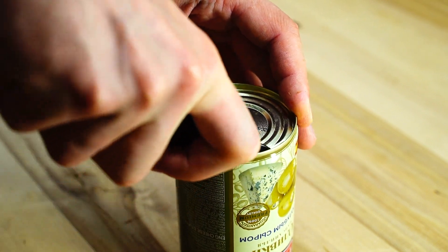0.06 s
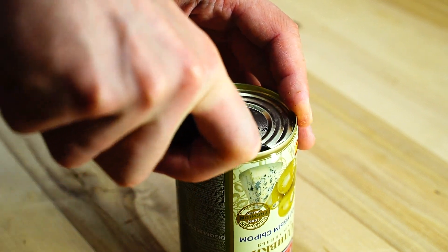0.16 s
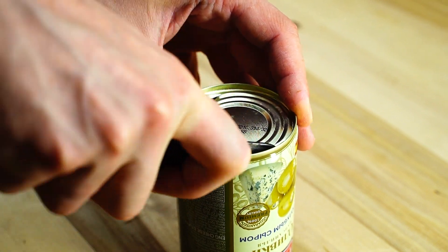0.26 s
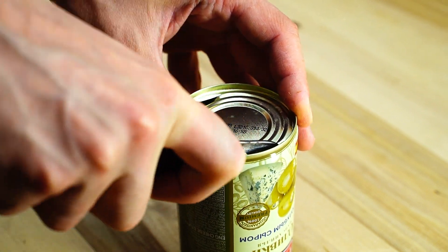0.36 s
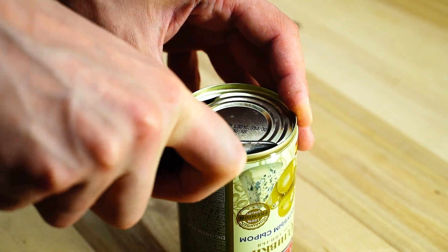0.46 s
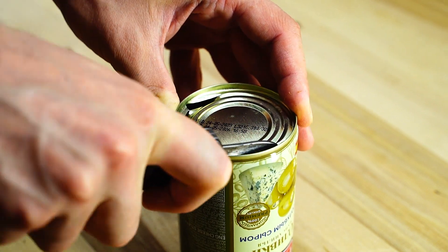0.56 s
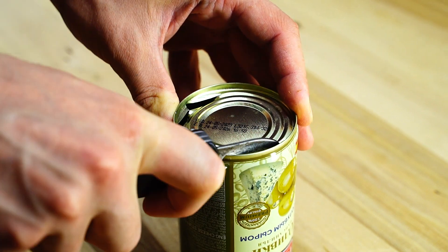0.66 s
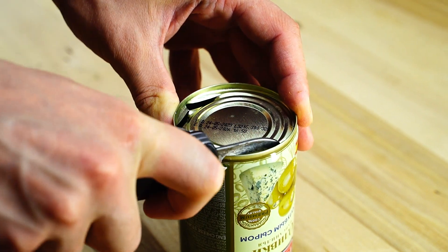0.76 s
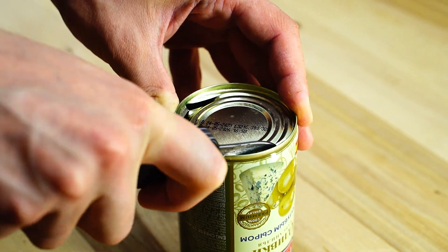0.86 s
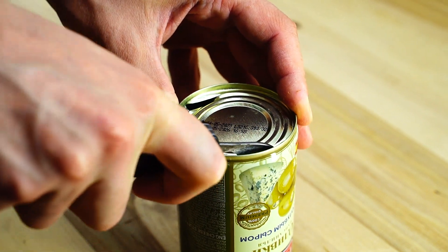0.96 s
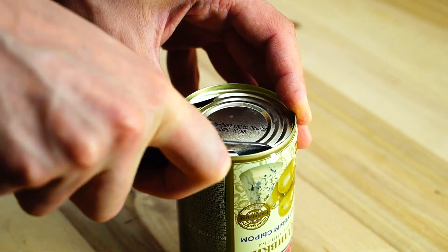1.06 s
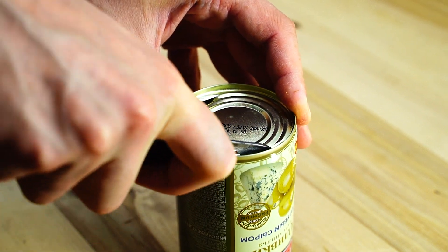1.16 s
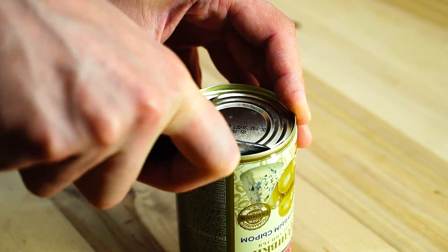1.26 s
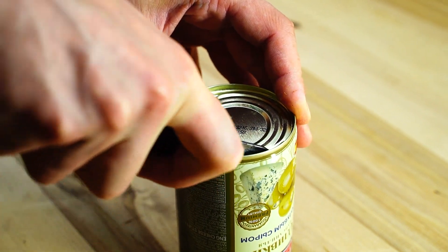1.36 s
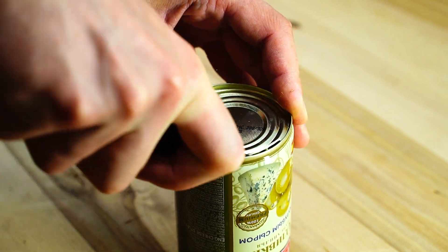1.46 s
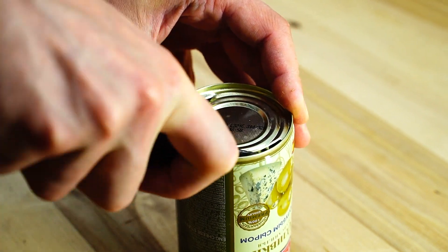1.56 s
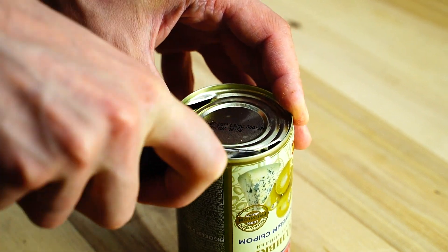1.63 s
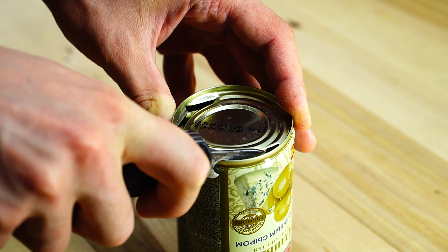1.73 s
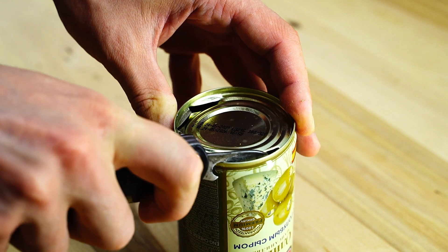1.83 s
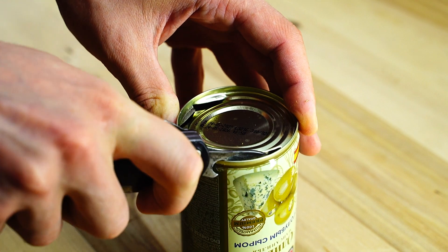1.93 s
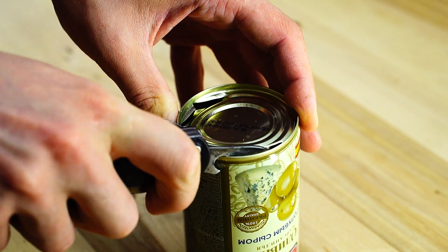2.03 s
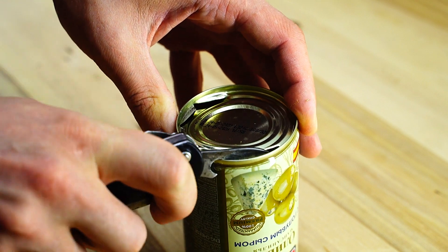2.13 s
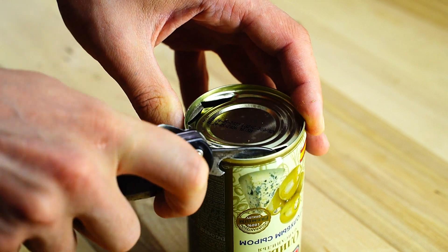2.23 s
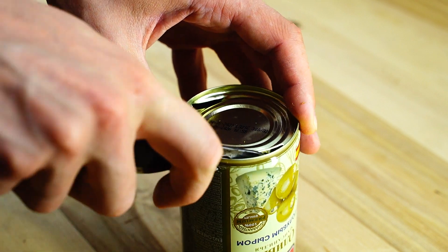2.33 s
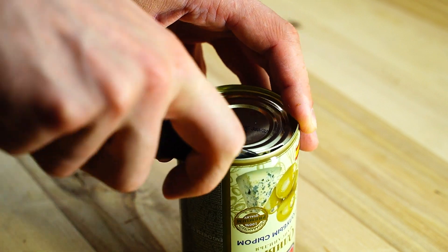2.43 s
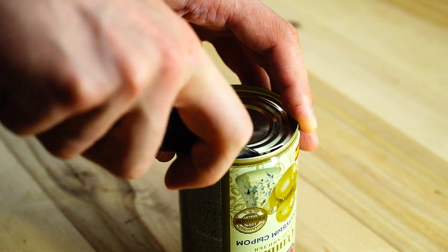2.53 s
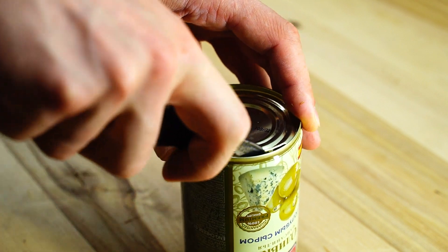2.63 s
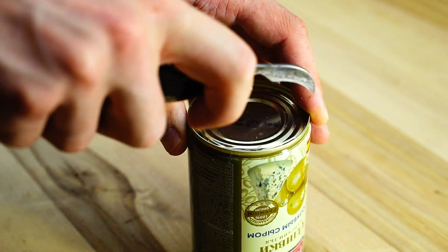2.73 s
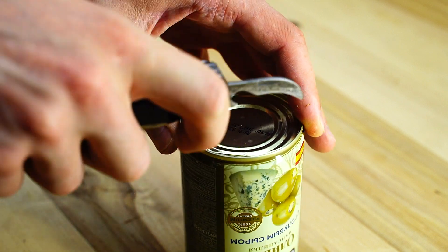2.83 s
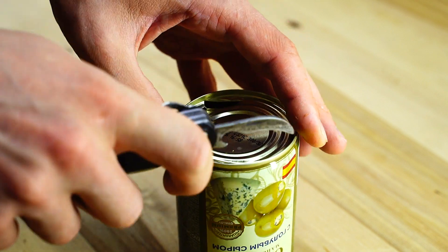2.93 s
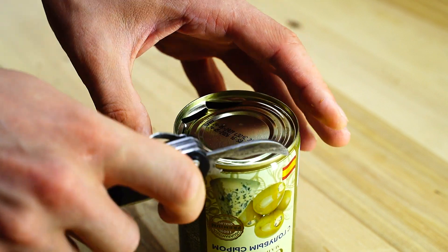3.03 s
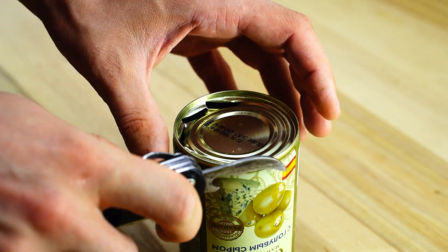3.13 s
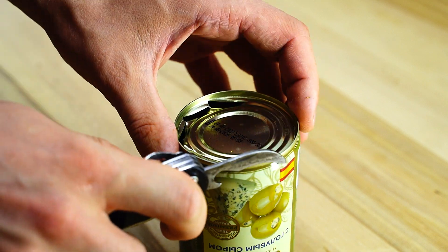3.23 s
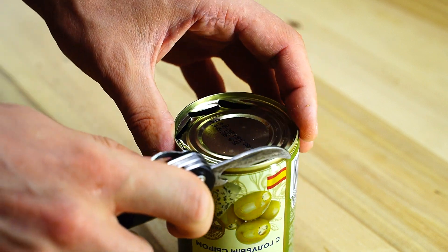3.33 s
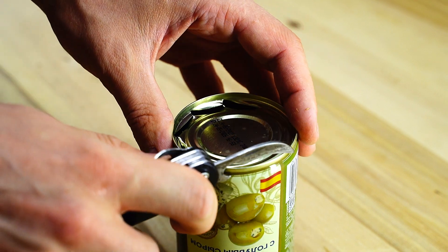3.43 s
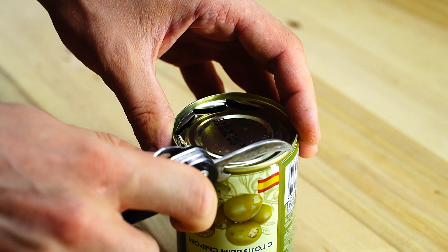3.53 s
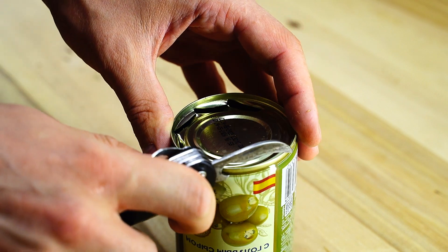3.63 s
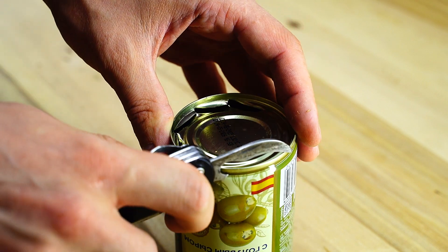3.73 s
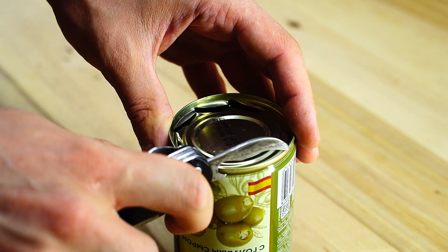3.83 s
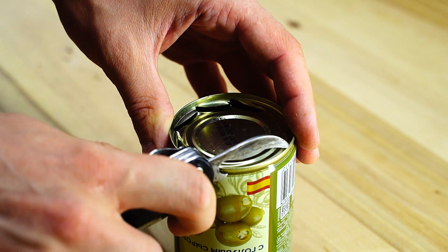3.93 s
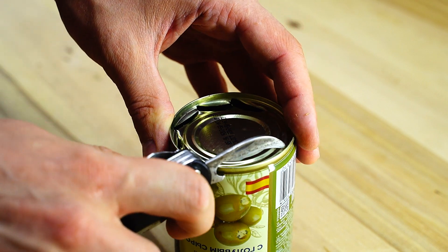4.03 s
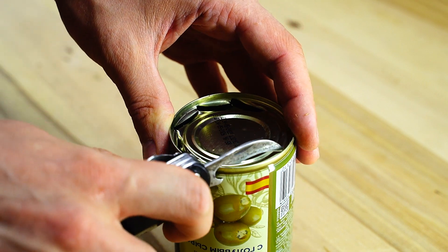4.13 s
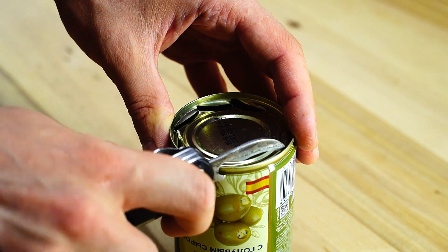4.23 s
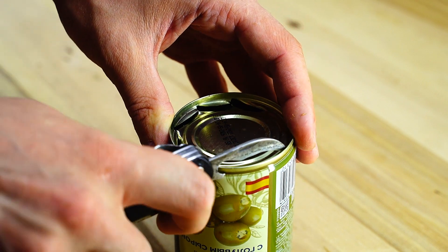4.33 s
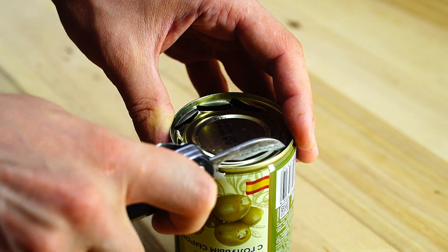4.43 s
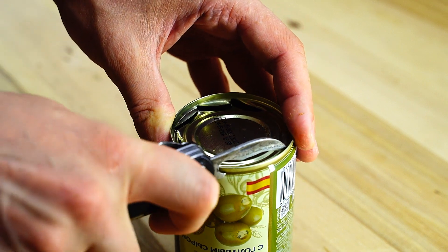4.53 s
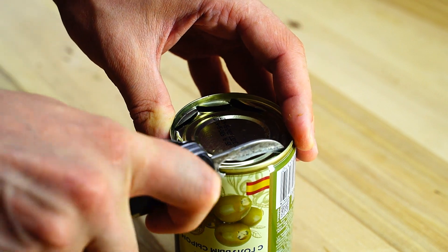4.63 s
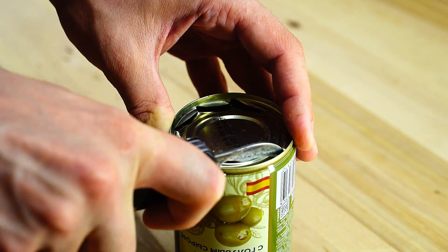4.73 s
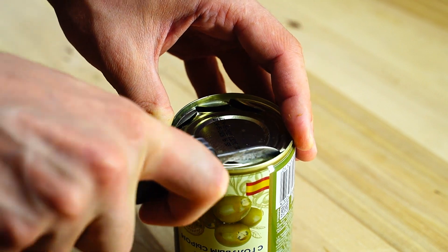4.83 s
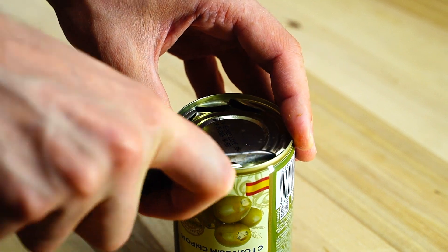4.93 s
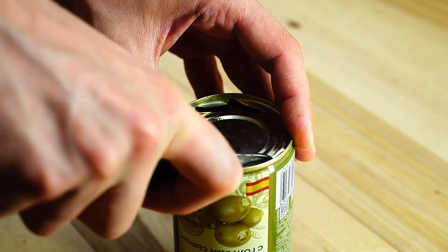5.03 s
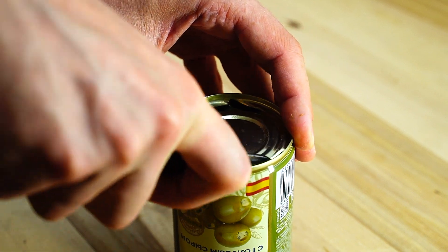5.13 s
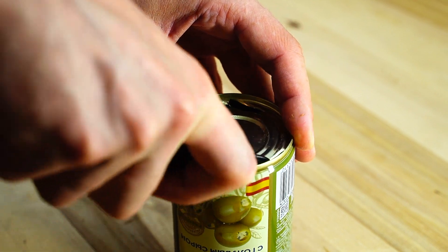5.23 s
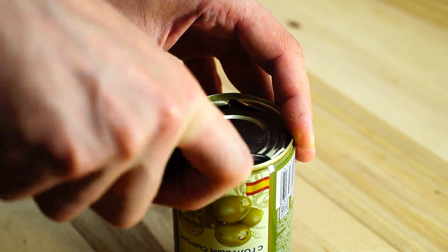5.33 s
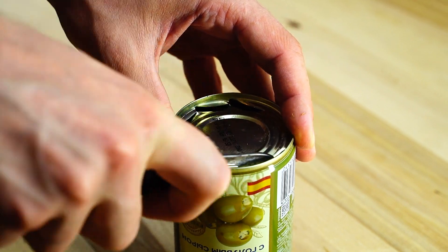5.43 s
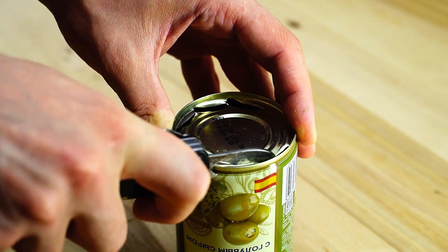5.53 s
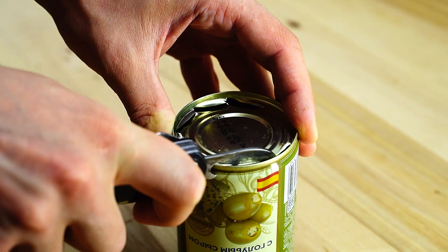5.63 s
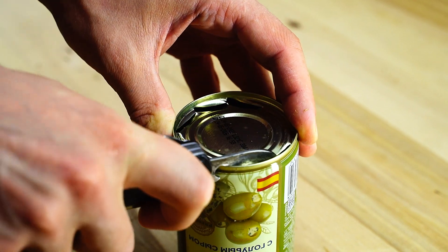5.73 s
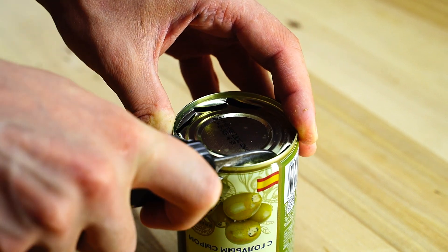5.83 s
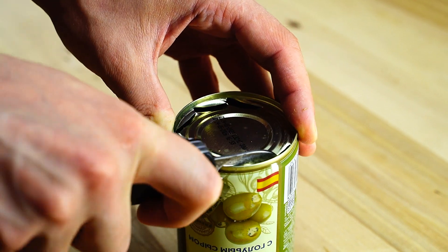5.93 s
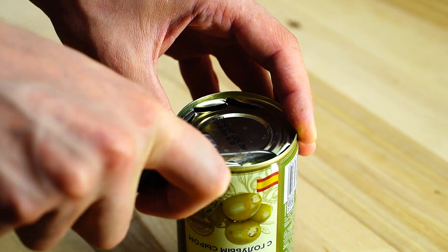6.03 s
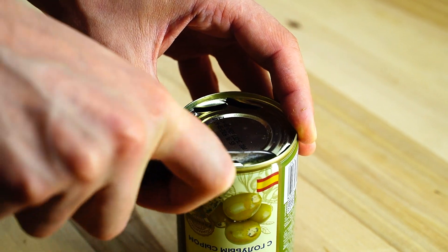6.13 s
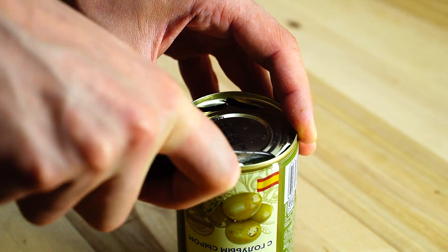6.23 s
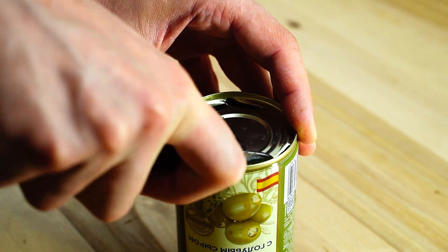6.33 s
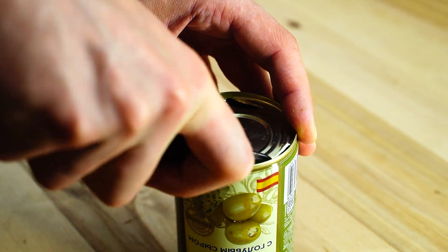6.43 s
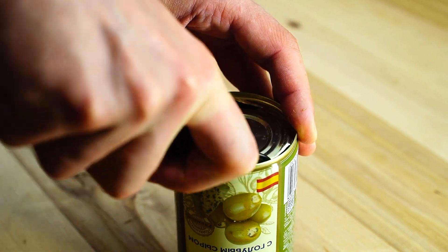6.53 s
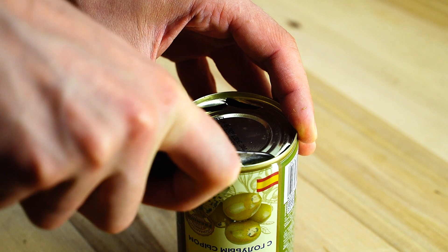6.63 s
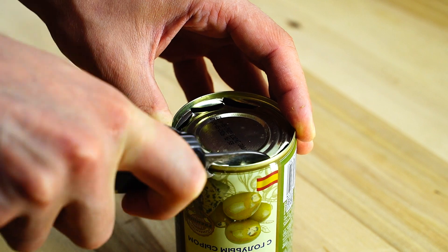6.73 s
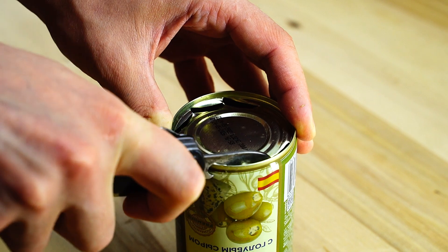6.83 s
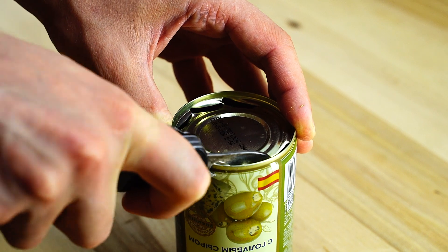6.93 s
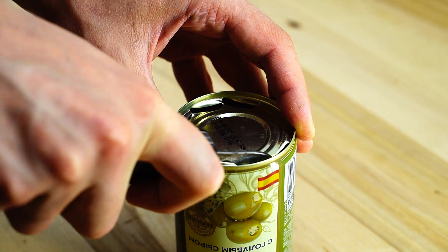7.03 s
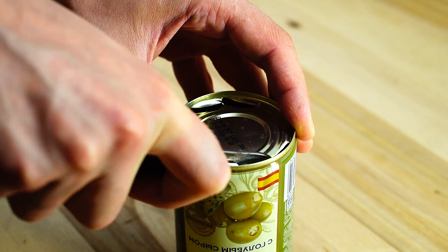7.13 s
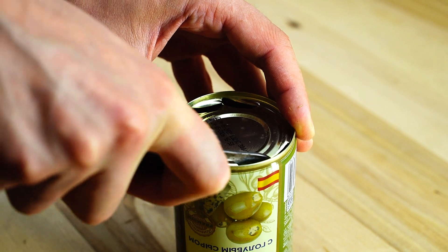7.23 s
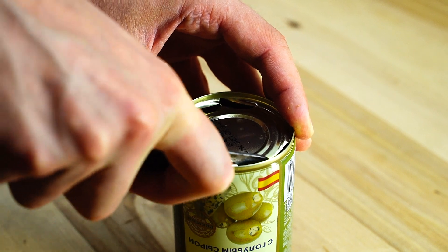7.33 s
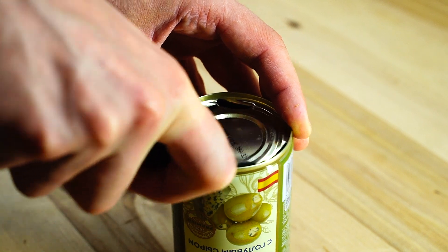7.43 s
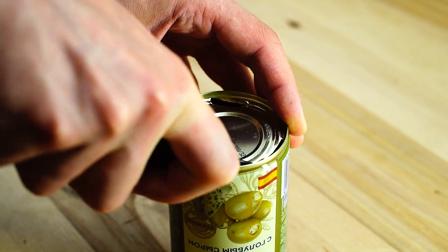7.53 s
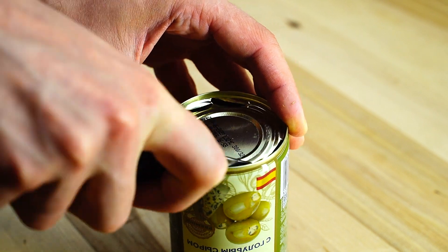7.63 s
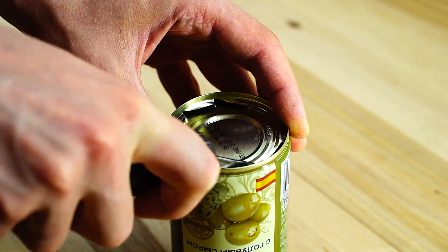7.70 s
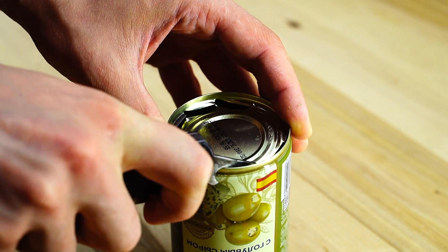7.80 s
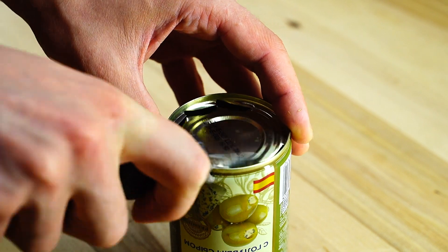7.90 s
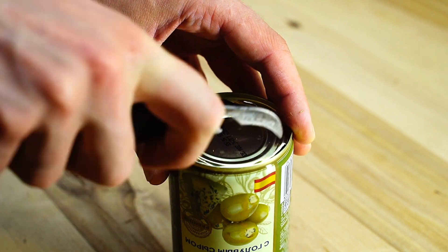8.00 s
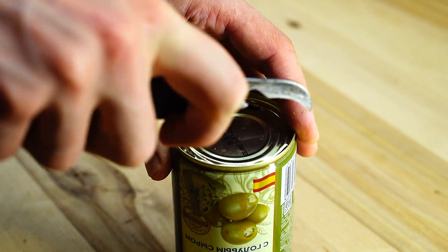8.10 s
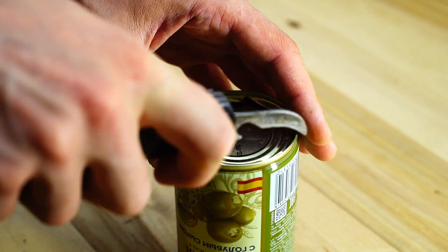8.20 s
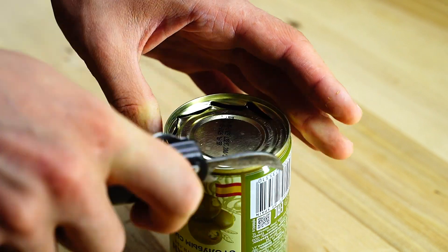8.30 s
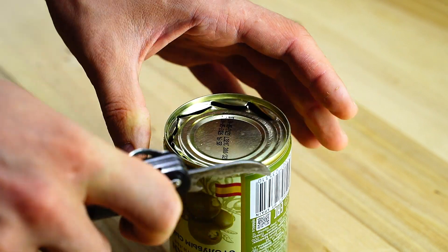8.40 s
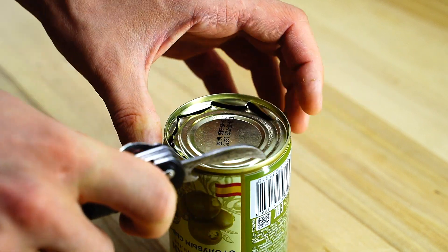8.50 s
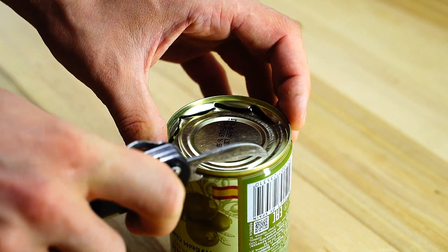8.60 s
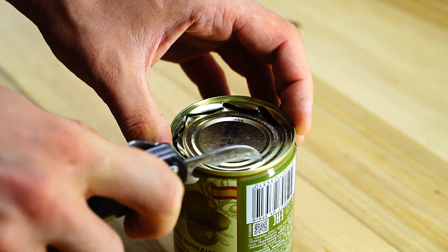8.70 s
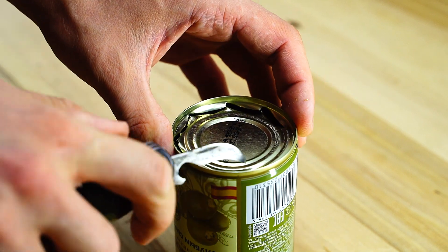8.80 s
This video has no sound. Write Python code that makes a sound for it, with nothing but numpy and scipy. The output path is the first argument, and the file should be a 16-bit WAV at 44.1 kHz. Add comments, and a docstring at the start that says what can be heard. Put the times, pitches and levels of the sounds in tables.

```python
"""A lever can opener works round the rim of a tin on a wooden table, miked close in a small bare room.
Each push of the blade is a burst of random slips that shakes the tin; the lid groans, squeals and buckles.
Loud snaps are short bursts of noise through the tin's resonances; twice the opener is jerked out and rings.
The room adds a decaying tail to most of it, over a steady hush. The recorder's limiter ducks on loud peaks
and then recovers, so the tail swells up behind them."""
import sys
import numpy as np
from scipy import signal
from scipy.fft import rfft, irfft, next_fast_len
from scipy.io import wavfile
from scipy.ndimage import map_coordinates

SR = 44100
rng = np.random.default_rng(int(sys.argv[2]) if len(sys.argv) > 2 else 0)


def unload_audio(sound):
    """Save the sound as a 16-bit wav file, at the path given as the first command line argument."""
    columns = np.transpose(np.atleast_2d(sound))
    # keep every value between -1 and 1, then stretch to whole-number steps
    steps = np.round(np.clip(columns, -1, 1) * 32767)
    wavfile.write(sys.argv[1], SR, steps.astype(np.int16))


N = 390726
TIME = np.arange(N) / SR
BLOW = TIME[:SR // 3]  # time within one blow [s]

# The hand pushes the blade along the cut; levels are before the trim of each layer:
# (start [s], swell [s], hold [s], friction [dB], treble over friction [dB],
#  groan of the lid over friction [dB], groan pitch at full effort [Hz])
PUSHES = [(0.439, 0.012, 0.0096, -30, 6, -5.5, 620), (0.499, 0.014, 0.0073, -35, 7.5, -5, 560),
          (0.576, .024, 0.051, -23.5, 0, 1, 620), (.872, .015, 0.076, -44.5, -4, -10.5, 620),
          (0.961, 0.019, 0.081, -47, -5.5, -1, 600), (1.073, 0.047, 0.1196, -55.5, -11, 11.5, 560),
          (1.71, 0.034, 0.018, -31, -2, 7, 505), (1.8, 0.016, 0.0516, -41, -5, 7, 570),
          (1.965, 0.033, 0.013, -43.5, -4.5, -4, 455), (2.086, .014, .055, -40, 1, -8, 600),
          (2.245, 0.012, 0.058, -38, -3.5, 7, 540), (2.315, 0.017, 0.07, -36, 0.5, 0, 580),
          (2.404, 0.011, 0.0085, -30, 0, 8.5, 587.6), (2.453, 0.0068, 0.0078, -29, -25, 9, 588),
          (2.516, 0.049, 0.019, -32.5, 4.5, 7.5, 454), (2.648, 0.062, 0.014, -23, 3.5, 3.5, 470),
          (2.819, 0.033, .06, -41, 0, -3.5, 500), (2.933, 0.027, 0.048, -39.5, 0.5, 2.5, 490),
          (3.262, 0.036, 0.065, -37.5, -4, 1.5, 500), (3.786, 0.032, .08, -56, 0, 1, 500),
          (4.009, 0.013, 0.015, -37.5, -8, -3, 480), (4.236, .035, 0.049, -50, -8, 8, 480),
          (4.882, 0.039, 0.045, -30, -7, 2, 456), (4.98, 0.026, .06, -26.5, -22, 1, 490),
          (5.098, 0.03, 0.056, -38, -34, 7.5, 444), (5.233, 0.037, 0.032, -51.5, -13, 2.5, 500),
          (5.402, 0.016, .025, -43.5, 6, 3.5, 544), (5.441, 0.017, 0.1295, -29.5, -2, 1, 570),
          (5.569, 0.021, 0.023, -27.5, 2, -1.5, 520), (5.761, .025, .025, -36, -2.5, 10, 503),
          (5.811, .02, 0.047, -42.5, -0.5, 13, 510), (6.045, 0.037, 0.059, -42.5, -3.5, 11.5, 580),
          (6.16, 0.02, .02, -48.5, -12, 12.5, 610), (6.28, 0.035, 0.14, -43, -18, 2, 400),
          (6.467, 0.056, 0.052, -46, -16, 2.5, 430), (6.654, 0.042, 0.014, -39, -7, 6, 605.3),
          (6.707, 0.007, 0.035, -32.5, -5, 9.5, 605), (6.748, 0.016, 0.025, -27.5, -4.5, 5.5, 560),
          (6.795, 0.015, 0.034, -43, -2, 12, 540), (6.991, 0.032, 0.044, -44.5, -3.5, 7, 590),
          (7.031, 0.058, 0.014, -33, -5.5, 5, 620), (7.154, 0.035, 0.0087, -44, -2, 3, 590),
          (7.367, 0.062, 0.015, -46.5, -14, -14, 500), (8.019, .035, 0.029, -21, 2, 1.5, 539.3),
          (8.193, 0.036, 0.12, -47, 11, -15.5, 500), (8.303, 0.034, .012, -41.5, 8.5, -8.5, 500),
          (8.635, 0.053, .02, -40.5, 5, 7.5, 630), (8.74, .025, .015, -48.5, -1, 0, 630)]
# Free modes of the opener's steel, lowest first: (frequency [Hz], level [dB], t60 [s])
STEEL_MODES = [(1286, -13, 1.9), (2256, -3, .45), (2620, 0, .35), (3165, -6, .5), (3765, 1, .4),
               (4785, 16, .3), (5276, -10, .55), (6422, -9, .5), (8140, 6, .18)]


def from_db(db):
    """Decibels to gain."""
    return 10 ** (np.asarray(db) / 20)


def rms_one(x):
    """Scale to rms 1."""
    return x / np.sqrt(np.mean(x ** 2) + 1e-20)


def height_one(x):
    """Scale a blow so that its eight largest samples average 1."""
    return x / np.sort(np.abs(x))[-8:].mean()


def at_hz(points, hz):
    """Read a table on a log-frequency axis."""
    f, value = np.transpose(points)
    return np.interp(np.log(np.maximum(hz, 1)), np.log(f), value)


def colour(x, *spectra):
    """Filter a signal by the sum of some spectra in dB, then scale to rms 1."""
    size = next_fast_len(len(x))
    hz = np.arange(size // 2 + 1) * SR / size
    gain = from_db(sum(at_hz(s, hz) for s in spectra))
    return rms_one(irfft(rfft(x, size) * gain, size)[:len(x)])


def butter(x, hz, kind):
    """Butterworth filter of design order 2."""
    return signal.sosfilt(signal.butter(2, hz, kind, fs=SR, output="sos"), x)


def add(track, s, sound):
    """Mix a sound in at a time."""
    start = round(s * SR)
    track[start:start + len(sound)] += sound[:N - start]


def drift(rate_hz):
    """Random wander between normal draws of spread 1, two draws per cycle of the rate."""
    steps = np.arange(0, TIME[-1] + 1, 1 / (2 * rate_hz))
    return np.interp(TIME, steps, rng.standard_normal(len(steps)))


def effort(start, swell_s, hold_s):
    """One move of the hand, from 0 to 1: a power-law swell, a sag as the metal gives way, a fast release."""
    swell_power, sag_db_per_s, release_db_per_s = 1.345, 40, 430
    t, out = TIME[:SR], np.zeros(N)
    sag_db = sag_db_per_s * np.maximum(t - swell_s, 0)
    release_db = release_db_per_s * np.maximum(t - swell_s - hold_s, 0)
    swell = np.minimum(t / max(swell_s, .002), 1) ** swell_power
    add(out, start, swell * from_db(-sag_db - release_db))
    return out


def moves(rows, bend=0):
    """Gain and pitch of moves (start, swell, hold, dB, Hz); the strongest sets the pitch, bent by effort."""
    gain, pitch = np.zeros(N), np.full(N, float(rows[0][-1]))
    for start, swell_s, hold_s, level_db, hz in rows:
        force = effort(start, swell_s, hold_s)
        level = from_db(level_db) * force
        leads = level > gain
        gain[leads] = level[leads]
        pitch[leads] = hz * (1 + bend * (force[leads] - 1))
    return gain, pitch


def curve(rows):
    """Gain (-120 dB outside the rows) and pitch of a short curve."""
    s, level_db, hz = np.transpose(rows)
    gain = from_db(np.interp(TIME, s, level_db, left=-120, right=-120))
    return gain, np.interp(TIME, s, hz)


def slips(per_s, spread_db):
    """Tiny stick-slip releases at random moments, of uneven size and either sign."""
    sizes = from_db(spread_db * np.minimum(rng.exponential(1, N), 4))
    return (rng.random(N) < per_s / SR) * sizes * rng.choice([-1, 1], N)


def rubbed(gain, hz, width_hz, skirt_hz, skirt_db):
    """Friction drives a resonance of given pitch: a narrow core on a broad skirt."""
    phase = 2 * np.pi * np.cumsum(hz) / SR
    half_width = width_hz / 2
    out = 0
    for carrier in (np.sin(phase), np.cos(phase)):
        drive = slips(per_s=1300, spread_db=0.5)
        core = rms_one(butter(drive, half_width, "low"))
        skirt = rms_one(butter(drive, [half_width, half_width + skirt_hz], "band"))
        out = out + carrier * (core + from_db(skirt_db) * skirt)
    return gain * rms_one(out)


def tin(x, detune=0., stand_out_db=0, wander_db=0, wander_hz=14):
    """Resonances of lid and wall stand out: pressure detunes them, a moving contact favours them in turn."""
    # (frequency before detuning [Hz], width [Hz], level over the direct sound, before stand_out_db [dB])
    tin_modes = [(647, 100, -2), (948.3, 19, 6.5), (1243, 16, 6.5), (1918, 36, 3), (2082, 40, 3.5),
                 (2403, 37, -10), (2600, 46, 4), (3211, 27, 8), (3787, 30, 8.5), (5120, 18, 3.5),
                 (5595, 28, 12), (6550, 110, 8.5), (8120, 210, 0.5), (9080, 370, -2), (12040, 220, 0)]
    out = x.copy()
    for hz, width, level_db in tin_modes:
        r = np.exp(-np.pi * width / SR)
        w = 2 * np.pi * hz * (1 + detune * rng.uniform(-0.85, 1)) / SR
        drive = x * from_db(wander_db * drift(wander_hz)) if wander_db else x
        b, a = np.array([1, 0, -1]) * (1 - r * r) / 2, [1, -2 * r * np.cos(w), r * r]
        # the tiny offset keeps the filter out of denormal numbers
        out += from_db(level_db + stand_out_db) * signal.lfilter(b, a, drive + 1e-18)
    return out


def catching():
    """The blade catches and lets go many times a second, as a random wander of the level."""
    return from_db(2.2 * drift(45))


def grinding(level_db=-1, treble_db=-5, split_hz=5000):
    """Slips of the blade shake the tin during each push; a sharper bite is brighter."""
    # colour of the slips: (frequency [Hz], level [dB])
    grind_spectrum = [(30, -32), (90, -10), (140, 11.5), (230, -4.5), (420, 12), (1100, 7), (1600, 6),
                      (2300, 3.5), (3500, -0.5), (4500, -6.5), (7000, -9.5), (11000, -10.5), (16000, -13)]
    gain, bite = np.zeros(N), np.zeros(N)
    for start, swell_s, hold_s, friction_db, bite_db, _, _ in PUSHES:
        friction = from_db(friction_db) * effort(start, swell_s, hold_s)
        gain = np.maximum(gain, friction)
        bite = np.maximum(bite, from_db(bite_db) * friction)
    drive = colour(slips(per_s=4000, spread_db=2.5) * catching(), grind_spectrum)
    grit = tin(drive, stand_out_db=3, wander_db=4.5)
    # the changing load bends all resonances together a little
    grit = map_coordinates(grit, [np.cumsum(1 + .018 * drift(3))], order=3, mode="mirror")
    # the dull part is levelled by its middle band
    dull = butter(grit, split_hz, "low") / np.std(butter(grit, [1500, 4500], "band"))
    bright = rms_one(butter(grit, split_hz, "high"))
    return from_db(level_db) * gain * dull - from_db(treble_db) * bite * bright


def groaning(level_db=-1, creak_db=-14, creak_low_hz=130, creak_high_hz=380):
    """The same pushes drive the lid's lowest mode and make the tin creak dully against the table."""
    rows = [(start, swell_s, hold_s, friction_db + groan_db, hz)
            for start, swell_s, hold_s, friction_db, _, groan_db, hz in PUSHES]
    # bend: share by which the pitch drops as the effort falls to nothing
    gain, pitch = moves(rows, bend=.04)
    creak = gain * rms_one(butter(slips(per_s=180, spread_db=3.5), [creak_low_hz, creak_high_hz], "band"))
    groan = rubbed(gain, pitch, width_hz=47.6, skirt_hz=194, skirt_db=-3.0)
    return from_db(level_db) * groan + from_db(creak_db) * creak


def squeals(waver_hz=14, rise_db=16):
    """The sliding blade locks on to single modes; each swells, wavers in pitch and rings out."""
    # (start [s], loudest [s], centre pitch [Hz], rms level when loudest [dB], t60 [s])
    squeal_times = [(2.73, 2.765, 603, -6.5, 0.061), (2.72, 2.795, 1278, -6, 0.14),
                    (2.72, 2.73, 1230, -13, .2), (2.765, 2.8, 780, -23, 0.058), (2.72, 2.726, 3772, 1, 0.1),
                    (4.995, 5.02, 2300, -30.5, 0.095), (5.51, 5.555, 600, -20, 0.2),
                    (5.57, 5.615, 500, -17.5, 0.23)]
    out = np.zeros(N)
    t = TIME[:SR]
    for start, top, hz, level_db, t60 in squeal_times:
        rise = max(top - start, .002)
        # the waver fades once the blade no longer drives the mode
        sticking = np.exp(-np.maximum(t - rise, 0) / 0.078)
        waver = rms_one(butter(rng.standard_normal(SR), 180, "low"))
        pitch = hz + waver_hz * sticking * waver
        shape_db = np.minimum(rise_db * (t / rise - 1), -60 * (t - rise) / t60)
        tone = np.sin(2 * np.pi * np.cumsum(pitch) / SR)
        add(out, start, np.sqrt(2) * from_db(level_db + shape_db) * tone)
    return out


def crack(t60, *spectra):
    """A blow sets a dense crowd of short modes ringing: coloured noise that dies away."""
    return colour(rng.standard_normal(len(BLOW)), *spectra) * from_db(-60 * BLOW / max(t60, .003))


def tin_blow(peak_db, bass_db, treble_db, t60, hz, lift_db, stand_out_db):
    """One sharp release of the sheet metal, dull or bright, coloured by the part that springs free."""
    # basic colour of a blow: (frequency [Hz], level [dB])
    snap_spectrum = [(25, -28), (80, -22), (140, -1.5), (190, -11.5), (240, -22), (320, -4.5), (600, 0.5),
                     (1100, -2), (1500, -6.5), (2600, -5), (4800, -9.5), (7500, -11.5), (11000, -16.5),
                     (16000, -19.5)]
    tilt = [(700, bass_db), (2000, 0.0015), (3500, 0.0023), (8000, treble_db)]
    width = 0.2  # share of its pitch over which the part's resonance falls away
    part = [(hz / (1 + width), 0), (hz, lift_db), (hz * (1 + width), 0)]
    burst = tin(crack(t60, snap_spectrum, tilt, part), detune=0.014, stand_out_db=stand_out_db)
    return from_db(peak_db) * height_one(burst)


def snaps():
    """The lid tears: each snap is a blow coloured by the torn flap."""
    # (time [s], peak before filter and limiter [dB], bass tilt [dB], treble tilt [dB], t60 of the burst [s],
    #  pitch of the torn flap [Hz], its lift [dB])
    snap_times = [(.239, 0.5, -20, 2.5, 0.062, 2280, 15), (0.2685, -0.5, -2.5, -5.5, 0.039, 640, 6.5),
                  (0.274, -6, 10, 1.5, 0.02, 672, 19), (0.6409, -9, 8, -15, 0.024, 667, 3.5),
                  (1.451, -9, 10.5, -8, 0.038, 2300, 11), (1.4766, 28.5, -3.5, -0.5, 0.026, 2950, 3),
                  (2.7216, 10.5, -11, -1, 0.035, 1154, 17.5), (4.6952, 8.5, 0.5, -15.5, 0.061, 1187, 6),
                  (4.736, 2, 0.5, -39, 0.03, 675.4, 6.5), (7.5202, -0.5, 8.5, -1.5, 0.056, 473, 8),
                  (7.536, 27, -4, 0, 0.019, 2660, 6), (7.691, 0, 2, -8, 0.021, 653, 7),
                  (7.713, -14, 2, -7.5, .022, 2100, 0.5), (7.7826, 15, -6.5, 6.5, 0.054, 765, 12),
                  (7.9909, -0.5, -7, 7, 0.18, 2600, 15), (8.0002, 11, -5.5, 0.5, 0.061, 1334, 14.5)]
    out = np.zeros(N)
    for s, *blow in snap_times:
        add(out, s, tin_blow(*blow, stand_out_db=-2.0))
    return out


def ticks(t60=0.05, level_db=1):
    """The blade taps the rim, coloured by a resonance of its own."""
    # (time [s], peak before level_db [dB], bass tilt [dB], treble tilt [dB])
    tick_times = [(2.186, -21, 1, -2), (2.3481, -27, 3, -4), (2.4179, -7.5, 11.5, 0), (2.458, -19, -2, 0),
                  (2.5413, -17, 9, 6), (2.5757, -13, 13, 1), (2.7494, -29, -12, 2),
                  (3.2808, -20.5, 21.5, 10), (3.2987, -14.5, -20, -8), (3.3323, -17.5, -11, -1),
                  (3.3913, -9, -4.5, 8.5), (3.5118, -19.5, -5, -6), (3.5312, -20.5, 8, -7),
                  (4.0696, -26, 12, -3), (5.13, -25.5, 19, -14), (5.451, -27, -14, -13),
                  (5.6446, -24, -6, -10), (5.7838, -26.5, -14, -7), (6.0756, -29.5, -14, -23),
                  (6.7087, -20, 24, -19), (6.766, -28, -1, -12), (8.6842, -28.5, 13, -16)]
    blade_hz, blade_lift_db = 5760, 5.5
    out = np.zeros(N)
    for s, peak_db, bass_db, treble_db in tick_times:
        tap = tin_blow(peak_db + level_db, bass_db, treble_db, t60, blade_hz, blade_lift_db, stand_out_db=-1.5)
        add(out, s, tap)
    return out


def seating(t60=0.062, level_db=2, ring_t60=.3):
    """The hook seats on the rim: a dull tap wakes only the steel's lowest mode, damped by the contact."""
    # (time [s], peak of the tap before level_db [dB], ring of the steel over that peak [dB])
    seat_times = [(3.902, -18, -12.5), (4.027, -20.5, -18), (4.197, -21, -10), (4.471, -27.5, -22),
                  (4.558, -29, -41.5)]
    # colour of the tap: (frequency [Hz], level [dB])
    seat_spectrum = [(50, -4), (150, 6), (450, 17.5), (1200, 12), (2000, 0), (3000, -39), (5800, -16.5),
                     (16000, -46)]
    out = np.zeros(N)
    ring = np.sin(2 * np.pi * STEEL_MODES[0][0] * BLOW) * from_db(-60 * BLOW / ring_t60)
    for s, peak_db, ring_db in seat_times:
        add(out, s, from_db(peak_db + level_db) * height_one(tin(crack(t60, seat_spectrum))))
        add(out, s, from_db(peak_db + ring_db) * ring)
    return out


def blows(taps_db):
    """All blows on the tin as they leave in one direction; so small a body radiates little bass."""
    return butter(snaps() + from_db(taps_db) * (ticks() + seating()), 120, "high")


def opener():
    """Jerked out of the cut, the steel rings freely in all its modes."""
    # (time [s], level added to each mode [dB])
    jerk_times = [(2.7225, -21), (8.001, -38)]
    t, out = TIME[:2 * SR], np.zeros(N)
    ring = sum(from_db(db - 60 * t / t60) * np.sin(2 * np.pi * hz * t) for hz, db, t60 in STEEL_MODES)
    for s, level_db in jerk_times:
        add(out, s, from_db(level_db) * ring)
    return out


def rasping():
    """The blade rasps out of the slit: friction on a resonance of falling pitch."""
    # (time [s], level before the trim below [dB], pitch [Hz])
    rasp_curve = [(7.79, -17.5, 959), (7.845, -9, 903), (7.88, -17.5, 890.5), (7.97, -52, 865)]
    return from_db(-2) * rubbed(*curve(rasp_curve), width_hz=130, skirt_hz=297, skirt_db=-13.5)


def knocks(thud_db=-5, thud_t60=0.068, level_db=-1, give_s=0.001):
    """The lid buckles: its lowest mode, tuned by the pressure on it, with a thud from the table."""
    # (time [s], level before level_db [dB], pitch [Hz], t60 [s])
    knock_times = [(0.847, -37.5, 600, 0.051), (0.939, -17.5, 646, 0.034), (1.336, -32.5, 312, 0.067),
                   (1.759, -14.5, 420, 0.083), (1.775, -11, 530, 0.038), (2.255, -7, 356, 0.05),
                   (2.418, -3.5, 600, 0.099), (2.458, -0.5, 583, 0.025), (2.531, -5.5, 466, 0.073),
                   (2.546, -4.5, 432.4, 0.17), (2.562, -3.5, 494, 0.12), (2.572, -0.5, 425, 0.076),
                   (2.683, -4, 412, 0.06), (2.696, -6.5, 571, 0.15), (2.996, -20.5, 487, 0.056),
                   (4.555, -20, 372, 0.14), (4.584, -29.5, 294, 0.19), (5.131, -11.5, 414, 0.068),
                   (5.644, -8.5, 522.5, 0.12), (6.763, -7, 645, 0.027), (7.283, -37.5, 305, 0.15),
                   (7.471, -34.5, 305, 0.14), (7.709, 1.5, 619, 0.08), (7.992, -9, 536, 0.12)]
    # colour of the thud: (frequency [Hz], level [dB])
    thud_spectrum = [(30, -43.5), (140, -19), (250, -13.5), (450, 20.5), (800, -15.5), (1150, 15),
                     (1800, -24.5), (5000, -19.5), (16000, -26.5)]
    out = np.zeros(N)
    for s, peak_db, hz, t60 in knock_times:
        drum = np.sin(2 * np.pi * hz * BLOW) * from_db(-60 * BLOW / max(t60, .01))
        thud = from_db(thud_db) * height_one(crack(thud_t60, thud_spectrum))
        onset = 1 - np.exp(-BLOW / give_s)
        add(out, s, from_db(peak_db + level_db) * (drum + thud) * onset)
    return out


def sliding():
    """The tin slides round on the table: broad friction noise of falling pitch."""
    # (time [s], level [dB], pitch [Hz])
    slide_curve = [(8.13, -35, 1744), (8.22, -40.5, 1481), (8.28, -33.5, 1217), (8.34, -34.5, 997),
                   (8.44, -58, 700)]
    return rubbed(*curve(slide_curve), width_hz=400, skirt_hz=500, skirt_db=-4)


def low_rubbing():
    """The tin's base judders on the wood, or a finger rubs (3.27 s): friction on a narrow low resonance."""
    # (start [s], swell [s], hold [s], level before the trim below [dB], pitch [Hz])
    rub_times = [(2.78, 0.065, 0.24, -31, 114), (3.27, 0.041, 0.38, -33.5, 170.2),
                 (7.82, 0.056, .04, -24.5, 118), (8.3, .08, 0.12, -31, 100.4)]
    return from_db(-13.0) * rubbed(*moves(rub_times), width_hz=12.4, skirt_hz=30, skirt_db=-25)


def room(x, build_s=0.002):
    """Reflections thicken, then die away, the treble fastest; two low standing waves ring along."""
    # decay of the small bare room: (frequency [Hz], t60 [s])
    room_decay = [(100, 0.43), (500, 0.41), (2500, 0.33), (7000, 0.33), (15000, 0.21)]
    # standing waves: (frequency [Hz], level before the tail is scaled [dB], t60 [s])
    standing_waves = [(134.5, -12.5, 0.3), (180.2, -16, 0.26)]
    edges, t, tail = np.geomspace(30, 18000, 12), TIME[:SR], 0
    for low, high in zip(edges, edges[1:]):
        band = butter(rng.standard_normal(SR), [low, high], "band")
        tail = tail + band * from_db(-60 * t / at_hz(room_decay, np.sqrt(low * high)))
    for hz, db, t60 in standing_waves:
        tail = tail + from_db(db - 60 * t / t60) * np.sin(2 * np.pi * hz * t)
    tail = tail * (1 - np.exp(-t / build_s))
    return signal.fftconvolve(x, tail / np.linalg.norm(tail))[:N]


def blow_tail(draws=3, level_db=-10):
    """Room tail of the blows: independent draws summed for an even spectrum; taps and seatings fed in lower."""
    return from_db(level_db) * sum(room(blows(taps_db=-4.0)) for _ in range(draws))


def hush(level_db=-53):
    """The steady background of the place: coloured noise."""
    # (frequency [Hz], level before scaling to rms 1 [dB])
    hush_spectrum = [(15, -32), (25, -10), (108, 7.5), (223, 2.5), (575, -4.5), (1040, -7.5), (1260, -6),
                     (1520, -10.5), (1940, -13.5), (3720, -14), (4140, -16.5), (14800, -18.5),
                     (16000, -17.5)]
    return from_db(level_db) * colour(rng.standard_normal(N), hush_spectrum)


def scene():
    """Direct sound at the close microphone plus the room; the blows feed the room most."""
    scrapes = grinding() + rasping() + sliding()
    lid = butter(knocks() + groaning() + squeals(), 200, "high")
    echo = blow_tail() + room(from_db(-14) * scrapes + from_db(-14.5) * lid)
    direct = blows(taps_db=0) + opener() + scrapes + lid + low_rubbing()
    return (direct + echo + hush())[None]


def limiter(x, threshold_db=-3, release_s=0.064, attack_s=0.0015):
    """The gain drops within milliseconds on a peak and recovers, quickly at first."""
    over_db = np.maximum(20 * np.log10(np.abs(x) + 1e-9) - threshold_db, 1e-9)
    # hold each peak's excess and let it decay exponentially
    rising = np.log(over_db) + TIME / release_s
    held_db = np.exp(np.maximum.accumulate(rising, axis=-1) - TIME / release_s)
    r = np.exp(-1 / (attack_s * SR))
    return x * from_db(-signal.lfilter([1 - r], [1, -r], held_db))


def record(dry, cutoff_hz=15900):
    """The recorder: limiter, overload on crests that still pass full scale, and a steep top cut."""
    clipped = np.clip(limiter(dry), -1, 1)
    return signal.sosfilt(signal.ellip(10, .1, 80, cutoff_hz, fs=SR, output="sos"), clipped)


dry = scene()
out = record(dry)
unload_audio(out)
```